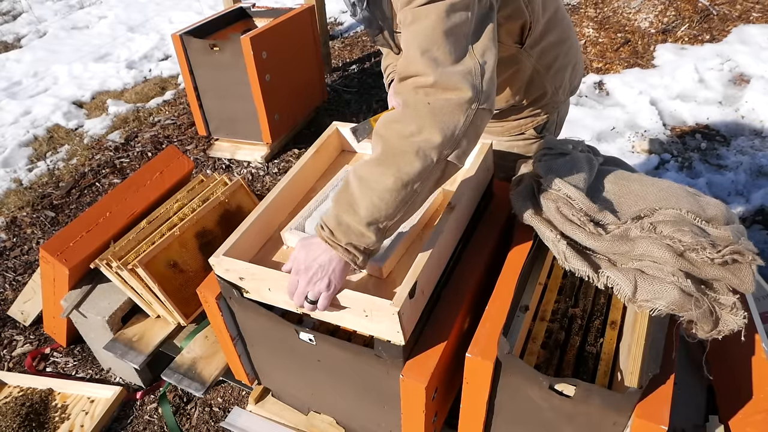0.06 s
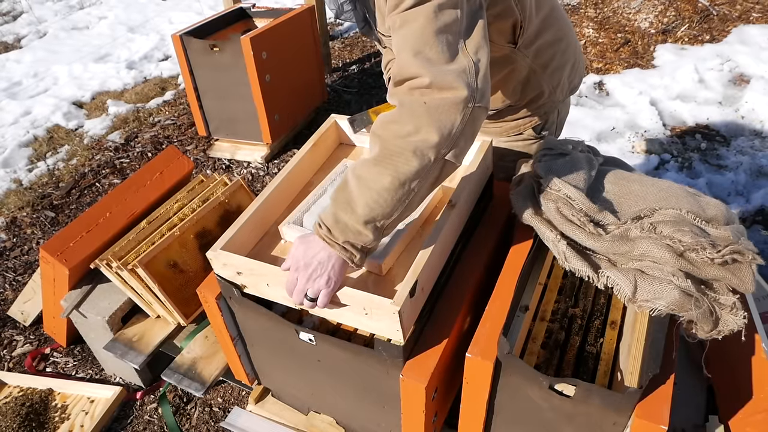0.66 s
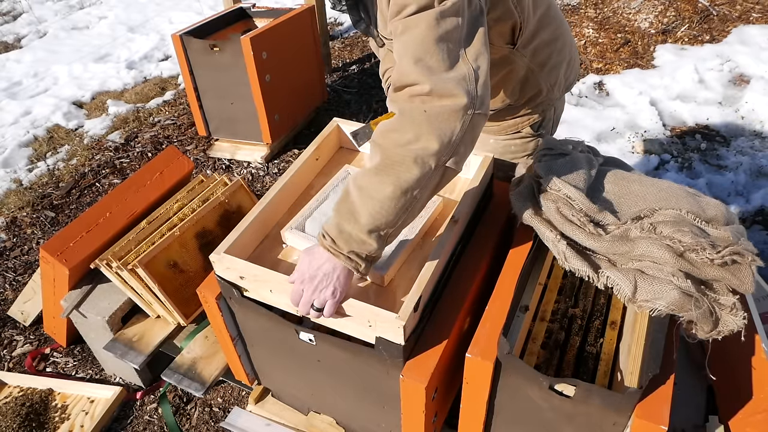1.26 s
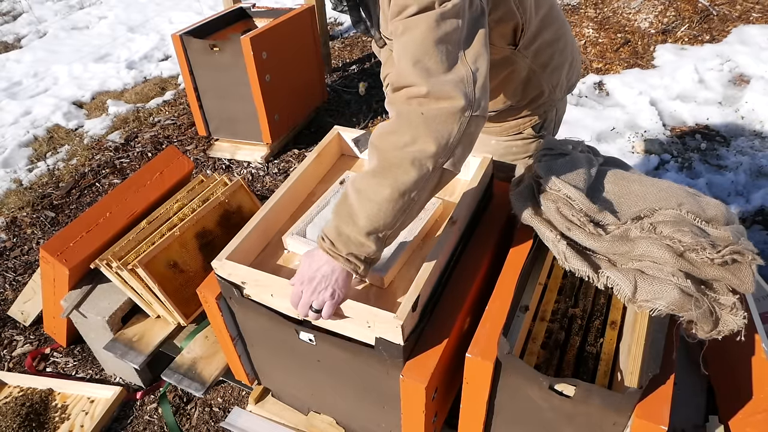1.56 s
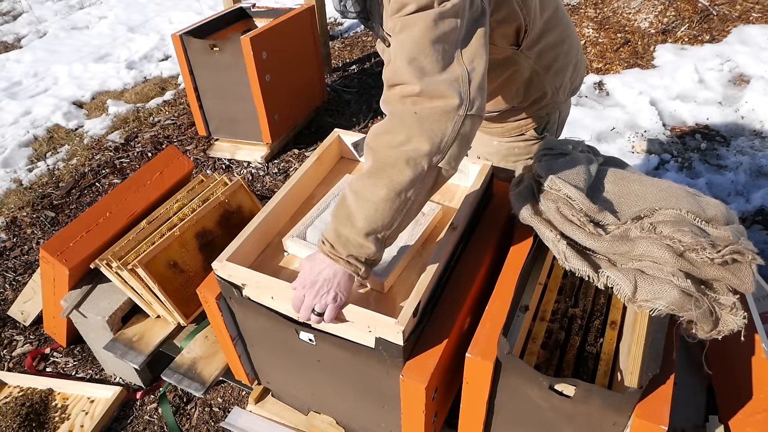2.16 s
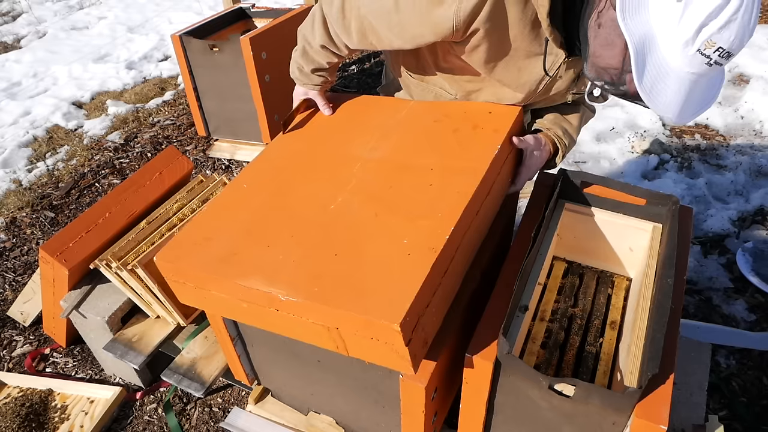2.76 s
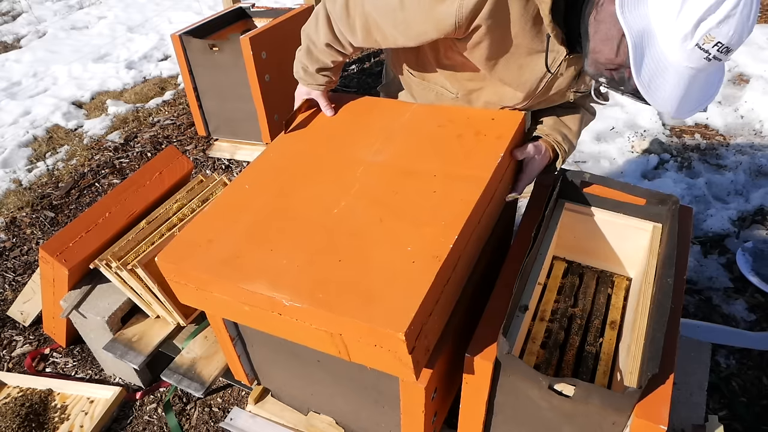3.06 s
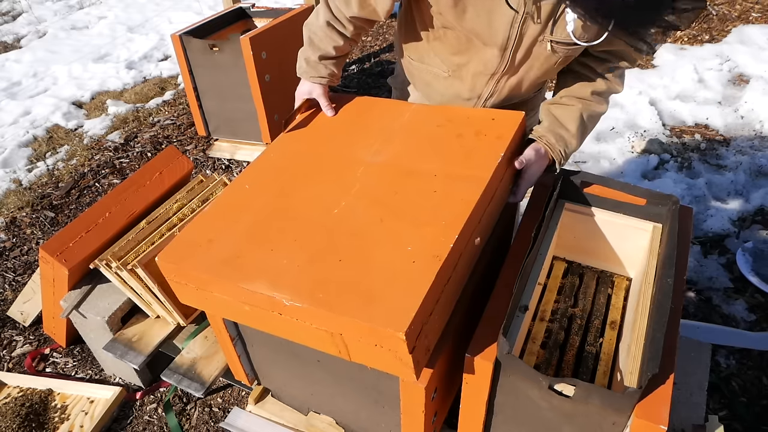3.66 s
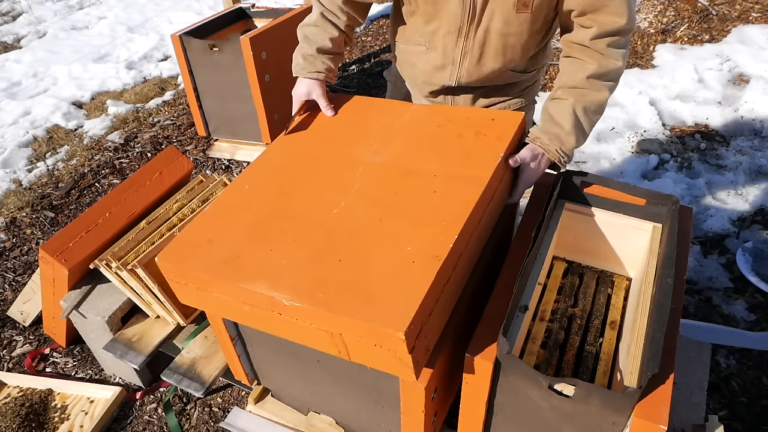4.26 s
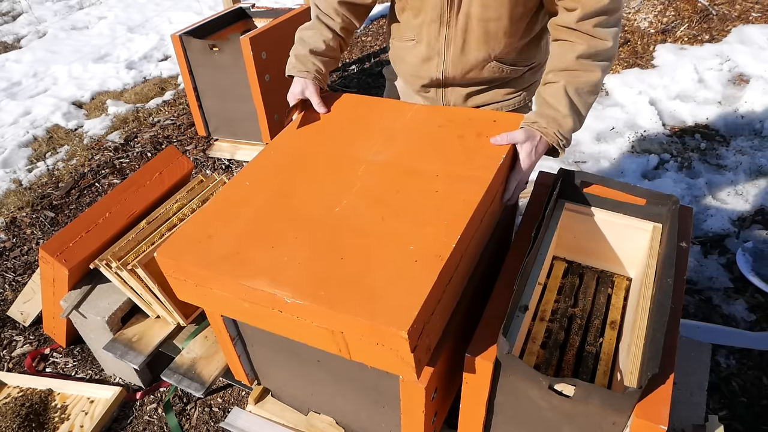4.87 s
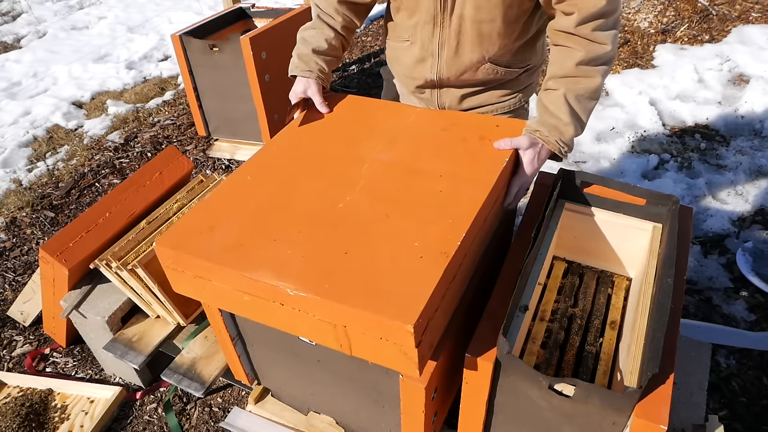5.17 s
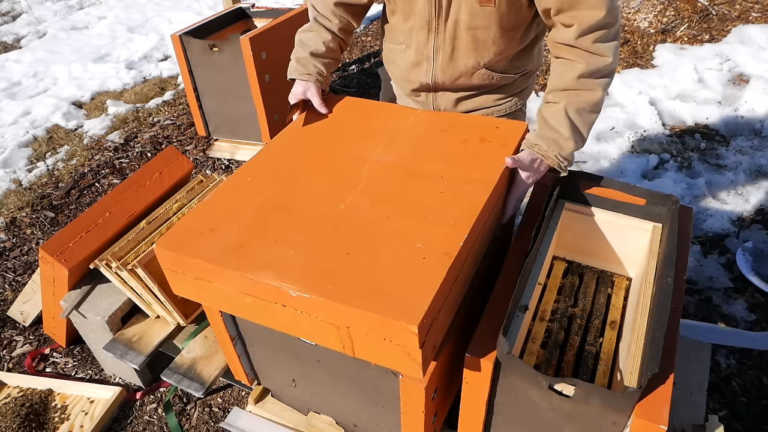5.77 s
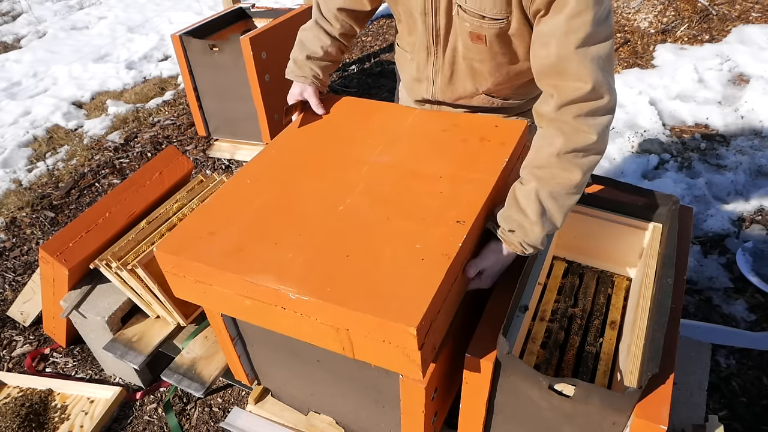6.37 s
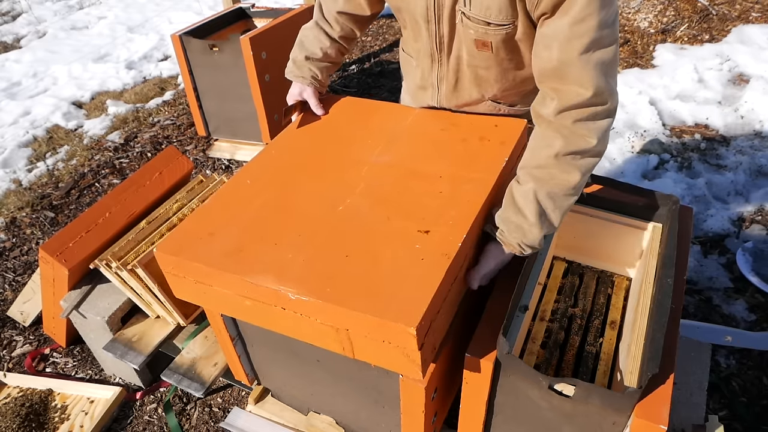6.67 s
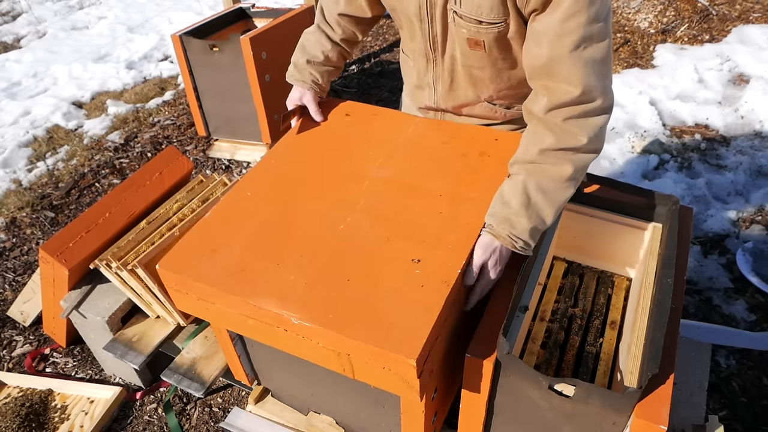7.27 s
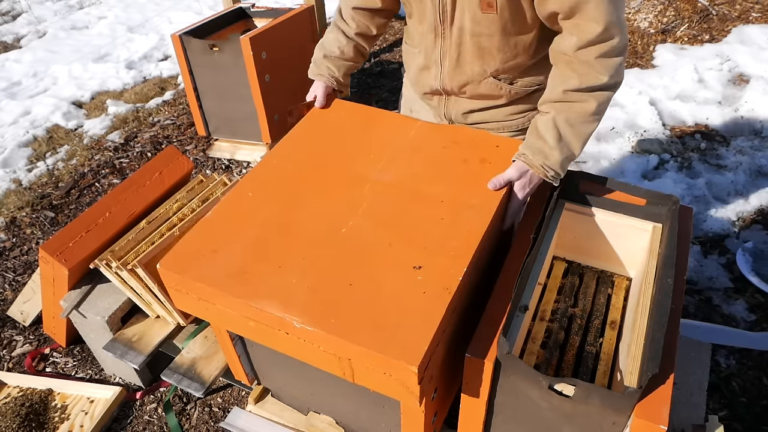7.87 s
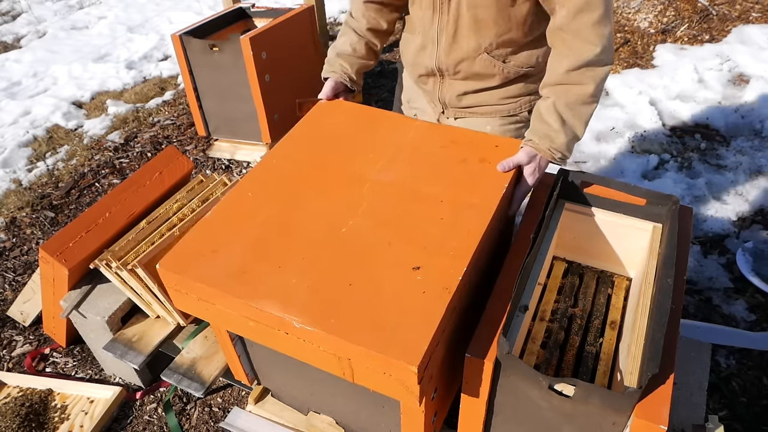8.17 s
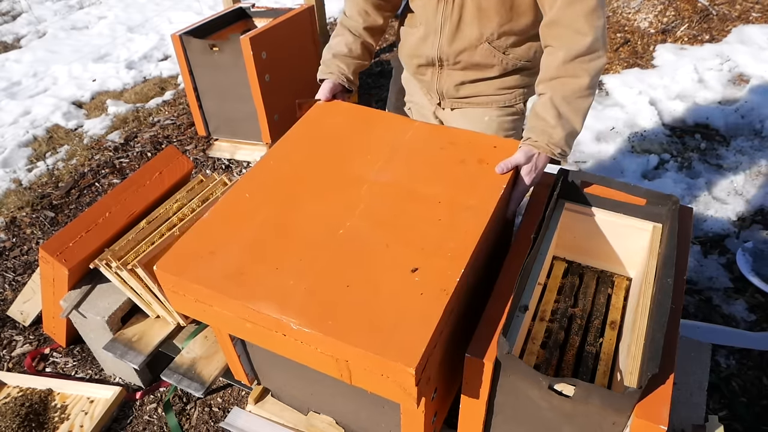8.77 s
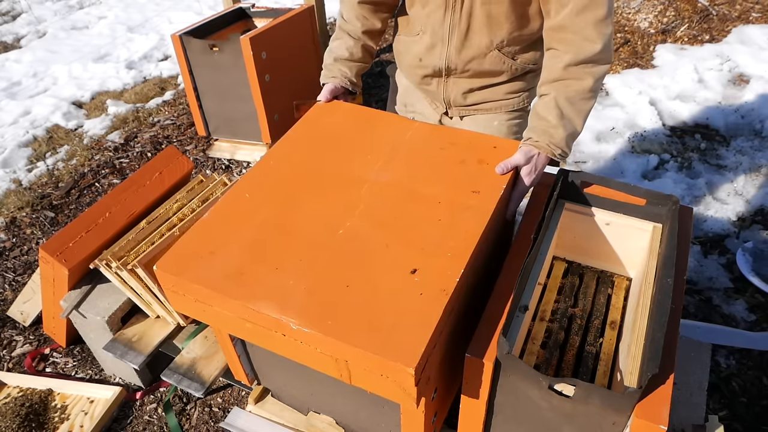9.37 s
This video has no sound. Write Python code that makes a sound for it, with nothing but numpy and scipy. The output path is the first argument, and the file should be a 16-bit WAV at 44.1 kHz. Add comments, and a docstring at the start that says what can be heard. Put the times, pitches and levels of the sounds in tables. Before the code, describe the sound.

Outdoors in gusty wind, a wooden hive lid drags, squeaks faintly and settles with hollow knocks amid rustling canvas.

```python
"""Closing a beehive

A beekeeper in a canvas jacket shifts a wooden tray on a hive, then works the lid down over it, outdoors.
Sleeves and hands rub, wood drags on wood with brief stick-slip squeaks, and grit and wax tick.
The lid taps and knocks as it seats, ringing its modes and thudding on the hollow hive body.
Wind buffets the microphone over a soft distant roar."""
import sys
import numpy as np
from scipy import signal
from scipy.fft import rfft, irfft
from scipy.io import wavfile
from scipy.ndimage import uniform_filter1d

SR = 44100
rng = np.random.default_rng(int(sys.argv[2]) if len(sys.argv) > 2 else 0)


def pcm_store(signal):
    """Save signal as 16-bit PCM."""
    levels = np.round(np.clip(np.atleast_2d(signal), -1, 1) * 32767)
    wavfile.write(sys.argv[1], SR, levels.astype(np.int16).T)


N = 415863

# bright hiss of firmly rubbed canvas, also the colour of the ticks: f/Hz, level/dB
CANVAS_SPECTRUM = [(500, -32), (1500, -7.5), (2400, 2.5), (3100, 2.5), (3900, 2.5), (4500, -1), (6200, -5),
                   (7300, 0), (8600, -0.5), (9700, -7.5), (11500, -7), (13000, -7), (16000, -17)]


def gain_of(db):
    """Decibels to amplitude."""
    return 10 ** (np.asarray(db) / 20)


def unit_rms(x):
    """Scales to rms 1."""
    return x / np.sqrt(np.mean(x ** 2) + 1e-20)


def colour(x, spectrum):
    """Shapes x with an EQ curve (f/Hz, level/dB) drawn on a log-frequency axis; rms 1."""
    hz, db = np.transpose(spectrum)
    f = np.fft.rfftfreq(len(x), 1 / SR)
    curve_db = np.interp(np.log(f + 1), np.log(hz + 1), db)
    return unit_rms(irfft(rfft(x) * gain_of(curve_db), len(x)))


def ring(x, hz, width_hz):
    """Passes x through one steep-sided resonance; rms 1."""
    f = np.fft.rfftfreq(len(x), 1 / SR)
    return unit_rms(irfft(rfft(x) / (1 + 2j * (f - hz) / width_hz) ** 2, len(x)))


def wobble(hz, width_hz):
    """Random modulation in a band of rates around hz; rms 1."""
    return ring(rng.standard_normal(N), hz, width_hz)


def add(mix, s, sound):
    """Mixes a sound in at time s."""
    part = mix[max(round(s * SR), 0):][:len(sound)]
    part += sound[:len(part)]


def wind(eddy_db=2, steadiness=0.75, burst_db=3.5, gust_eddy_db=-22):
    """Large eddies push on the microphone; small ones break off in bursts. Gusts swell both."""
    # the breeze: t/s, buffet level/dB, eddy level/dB
    breeze = [(0, -26, -42.5), (.97, -21.5, -40.5), (1.1, -27, -42), (1.8, -30, -45), (2.75, -33, -47),
              (2.79, -13.5, -33), (3.0, -13, -33), (3.4, -12.5, -38), (3.6, -19.5, -43), (3.87, -15, -35.5),
              (4.55, -17, -31), (4.95, -22, -43), (5.55, -17, -31), (6.8, -24.5, -41), (7.2, -20, -36.5),
              (7.6, -22.5, -42.5), (7.77, -16, -36), (9.12, -19, -31), (9.43, -17, -39.5)]
    # gusts that stand out of it: middle t/s, length/s, level/dB
    single_gusts = [(1.447, 0.29, -26), (2.023, 0.37, -21.5), (3.148, 0.039, -7), (3.324, 0.042, -11),
                    (3.855, 0.095, -11), (4.969, 0.05, -13), (5.14, 0.059, -15), (5.306, 0.059, -11.5),
                    (5.42, 0.039, -8), (6.006, 0.19, -12.5), (7.076, 0.3, -12.5), (7.815, 0.18, -10),
                    (8.063, 0.13, -11), (8.627, 0.1, -11.5), (9.135, 0.084, -10)]
    # deep rumble of the large eddies: f/Hz, level/dB
    buffet_spectrum = [(5, -13), (9, 4), (27, -3), (55, -6.5), (85, -13), (120, -23), (200, -37),
                       (400, -44.5), (1000, -100)]
    # low flutter of the small eddies: f/Hz, level/dB
    eddy_spectrum = [(50, -47), (100, 2.5), (150, 2), (220, -4.5), (320, -12.5), (450, -21), (700, -31),
                     (2000, -57)]
    times, *levels_db = np.transpose(breeze)
    buffet_level, eddy_level = (gain_of(np.interp(np.arange(N) / SR, times, db)) for db in levels_db)
    gusts = np.zeros(N)
    for middle, length, db in single_gusts:
        add(gusts, middle - length / 2, gain_of(db) * signal.windows.hann(int(length * SR)))
    buffet = colour(rng.standard_normal(N), buffet_spectrum)
    power = uniform_filter1d(uniform_filter1d(buffet ** 2, size=2400), size=1200)
    buffet = unit_rms(buffet / power ** (steadiness / 2))  # compressed, so each gust keeps its strength
    bursts = gain_of(burst_db * wobble(2.6, 74))
    eddies = colour(rng.standard_normal(N) * bursts, eddy_spectrum)
    buffet *= np.hypot(buffet_level, gusts)
    eddies *= np.hypot(eddy_level, gain_of(gust_eddy_db) * gusts)
    return buffet + gain_of(eddy_db) * eddies


def distant_roar(db=-42.5):
    """The even roar of the open country."""
    # dark outdoor air: f/Hz, level/dB
    air_spectrum = [(100, 12.5), (300, -6), (400, -0.5), (500, 4.5), (630, -0.5), (1000, -0.5),
                    (1500, -7.5), (2200, -15), (3200, -22), (6300, -27.5), (8500, -24.5), (10000, -31),
                    (13500, -35), (16000, -39)]
    return gain_of(db) * colour(rng.standard_normal(N), air_spectrum)


def friction(grains_per_s, grain_share, flutter_db):
    """Countless tiny slips merge into hiss; a few stand out as grains, and the pressure flutters."""
    grains = (rng.random(N) < grains_per_s / SR) * rng.standard_normal(N)
    pressure = gain_of(flutter_db * wobble(24, 160))
    hiss = rng.standard_normal(N)
    return pressure * (np.sqrt(1 - grain_share) * hiss + np.sqrt(grain_share) * unit_rms(grains))


def squeaks():
    """A sliding edge catches and chatters around one pitch."""
    # stick-slip squeaks and rasps: middle t/s, length/s, f/Hz, width/Hz, level/dB
    catches = [(0.2, 0.24, 3930, 5000, -61), (0.995, 0.026, 7450, 900, -53), (1.243, 0.074, 2380, 400, -55),
               (1.85, 0.14, 2500, 1800, -53), (2.49, 0.048, 3220, 450, -39),
               (2.819, 0.041, 1700, 3000, -38), (2.863, .03, 3100, 900, -40), (4.012, 0.13, 3470, 900, -54),
               (4.26, 0.24, 3700, 900, -53.5), (4.331, 0.03, 3500, 1000, -36),
               (4.468, 0.11, 3140, 900, -39), (4.8, 0.19, 2170, 2200, -65), (5.957, 0.081, 3450, 400, -41),
               (6.035, 0.023, 7300, 900, -35), (6.114, 0.19, 2670, 330, -35), (6.121, 0.3, 3740, 600, -41),
               (7.204, 0.22, 8550, 600, -39), (7.338, 0.15, 8600, 700, -39)]
    slips = friction(grains_per_s=310, grain_share=0.097, flutter_db=-1)
    chatter = slips * gain_of(3 * wobble(70, 120))
    out = np.zeros(N)
    for s, length, hz, width_hz, db in catches:
        swell = signal.windows.hann(int(length * SR))
        squeak = ring(chatter[int(s * SR):][:len(swell)], hz, width_hz)
        add(out, s - length / 2, gain_of(db) * swell * squeak)
    return out


def grit_ticks(t60=0.017, width_hz=9000):
    """Grit and wax snap between the parts."""
    # tiny dry snaps: t/s, level/dB, centre f/Hz
    snaps = [(0.138, -41.5, 7460), (0.478, -52, 10500), (1.56, -42, 6500), (1.802, -29.5, 2180),
             (1.829, -37, 3500), (1.949, -36.5, 8000), (2.057, -48, 4000), (2.319, -41.5, 3500),
             (2.777, -28.5, 3500), (2.858, -42, 4000), (2.993, -34, 8000), (3.261, -37, 4000),
             (3.493, -46, 3200), (4.323, -34, 3500), (6.762, -33, 3500), (7.231, -46, 3030),
             (7.479, -49, 4500), (8.772, -38.5, 6040), (8.843, -47, 5000)]
    out, t = np.zeros(N), np.arange(2048) / SR
    for s, db, hz in snaps:
        snap = ring(colour(rng.standard_normal(len(t)), CANVAS_SPECTRUM), hz, width_hz)
        add(out, s, gain_of(db - 60 * t / t60) * snap)
    return out


def stroke_envelope(surface, speed_power=1.72, settle_s=.16, settle_db=-11):
    """Friction level of "canvas" or "wood": each push gathers speed, holds it and comes to rest."""
    # arm pushes, sliding sleeve and wood together: t/s, rise/s, hold/s, fall/s, canvas/dB, wood/dB
    pushes = [(1.048, 0.23, .02, .08, -59, -51.5), (1.344, .06, 0.034, 0.088, -60, -52),
              (1.66, 0.15, .03, 0.16, -59, -45.5), (1.772, 0.03, .003, 0.055, -53, -40),
              (2.366, .11, 0.014, 0.038, -42, -38.5), (2.647, 0.055, 0.034, .03, -63, -56),
              (2.777, 0.0072, 0.019, 0.051, -44.5, -39.5), (2.851, 0.0076, 0.0081, .02, -43.5, -40),
              (2.99, 0.066, 0.064, 0.053, -50, -51), (3.194, 0.015, 0.032, 0.14, -46.5, -50),
              (3.56, .04, .06, .05, -56.5, -71), (3.723, .06, 0.06, .04, -52.5, -56),
              (3.916, 0.042, .005, 0.037, -46.5, -48), (3.973, 0.057, .01, 0.044, -47.5, -60),
              (4.188, .12, .01, .02, -58, -50), (4.313, .01, 0.0055, 0.057, -38.5, -36),
              (4.365, .03, .01, 0.033, -53, -47), (4.42, 0.037, 0.018, 0.061, -42, -43),
              (4.502, 0.038, 0.12, 0.071, -46, -44.5), (4.663, 0.13, 0.018, 0.059, -60, -42),
              (5.086, .02, 0.037, 0.047, -53.5, -44), (5.328, 0.037, 0.032, .04, -48.5, -44.5),
              (5.403, 0.037, .02, 0.12, -43.5, -41.5), (5.486, .06, 0.042, 0.16, -48, -44.5),
              (5.717, .06, .07, .06, -47.5, -44.5), (5.82, 0.054, .02, 0.052, -43, -57),
              (5.902, 0.097, .08, .14, -39, -43.5), (6.118, 0.041, .05, 0.11, -43, -43.5),
              (6.28, 0.089, 0.044, 0.074, -55, -51), (6.476, 0.052, 0.021, 0.027, -53, -52),
              (6.555, 0.029, 0.022, 0.16, -48.5, -44), (6.724, 0.034, 0.022, 0.043, -50.5, -49),
              (6.926, 0.017, .005, 0.035, -49, -36), (6.955, 0.039, 0.012, 0.1, -40, -36),
              (7.098, 0.071, 0.021, 0.14, -36.5, -36.5), (7.179, 0.035, .005, 0.058, -36, -27.5),
              (7.285, .055, 0.05, 0.062, -36, -34), (7.477, 0.0068, 0.0064, 0.012, -49, -65),
              (7.506, 0.072, 0.027, 0.097, -37.5, -45), (7.656, 0.12, 0.16, 0.044, -41, -44.5),
              (7.908, 0.066, 0.046, 0.097, -38, -40.5), (8.096, 0.047, 0.061, 0.072, -48, -45.5),
              (8.297, 0.073, 0.055, 0.065, -48.5, -42.5), (8.52, 0.072, 0.13, 0.14, -61, -68),
              (8.91, .05, .05, .08, -62.5, -64)]
    power = np.zeros(N)
    for start, rise, hold, fall, canvas_db, wood_db in pushes:
        db = canvas_db if surface == "canvas" else wood_db
        length = rise + hold + fall
        t = np.arange(0, length, 1 / SR)
        ramp = np.clip(np.minimum(t / rise, (length - t) / fall), 0, 1)
        speed = np.sin(np.pi / 2 * ramp)
        add(power, start, (gain_of(db) * speed ** speed_power) ** 2)
    level = np.sqrt(power)
    stir = uniform_filter1d(level, size=int(settle_s * SR))  # the parts stir faintly around each push
    return np.hypot(level, gain_of(settle_db) * stir)


def canvas_rub(db=3, firm_db=-44):
    """Canvas hisses over the boards, its tone shifting with force; the lid reflects it as the arm moves."""
    # hiss of lightly brushed canvas: f/Hz, level/dB
    light_spectrum = [(500, -49), (1500, 7), (2400, 0), (3100, 8.5), (3600, 6.5), (4100, 6.5), (4500, 1),
                      (6200, -1.5), (7400, 1.5), (8600, 1), (9700, -7.5), (11500, -14), (13000, -6),
                      (16000, -22)]
    level = stroke_envelope("canvas")
    slips = friction(grains_per_s=860, grain_share=0.13, flutter_db=1.26)
    n = np.arange(N)
    delay_s = .0009 * np.exp(.3 * wobble(1, 2))
    slips = slips + .4 * np.interp(n - SR * delay_s, n, slips)  # the moving reflection gently flanges
    firmness = level / (level + gain_of(firm_db))
    hiss = firmness * colour(slips, CANVAS_SPECTRUM) + (1 - firmness) * colour(slips, light_spectrum)
    return gain_of(db) * level * hiss


def wood_drag(db=3):
    """Slips of wood on wood sound through the boards."""
    # body of the boards: f/Hz, level/dB
    board_spectrum = [(120, 4), (240, 7.5), (340, 12), (430, 4), (560, 8), (780, 4), (1080, 5.5), (1400, 0),
                      (2000, 0), (2800, -3), (3800, -14.5), (5000, -13.5), (9000, -32.5), (16000, -51)]
    slips = friction(grains_per_s=320, grain_share=0.39, flutter_db=-2.0)
    return gain_of(db) * stroke_envelope("wood") * colour(slips, board_spectrum)


def lid_ring(band_hz, rattle_t60=0.031, yard_db=-24, yard_t60=0.11):
    """The struck lid in one band: its modes, the dense rattle of its joints, a faint return from the yard."""
    # modes of the lid: f/Hz, level/dB, t60/s
    lid_modes = [(175, -8, 0.1), (254, -4, 0.086), (295, 1.5, 0.041), (358, -4, 0.095), (450, -1.5, 0.045),
                 (498.5, 2, 0.068), (593, 3, 0.04), (686, -24, 0.022), (1002, -6.5, 0.059),
                 (1086, 3.5, 0.042), (1266, 3.5, 0.023), (1430, -9.5, 0.069), (1930, -11, 0.019),
                 (2090, 11, 0.012), (2630, -42, 0.0078), (2700, -5, .02), (3000, 15, 0.0056),
                 (4190, -1, 0.021), (5030, -8, 0.033), (5900, -12, 0.014), (6560, -27, .014),
                 (7360, -13, 0.014), (8800, -14, 0.011)]
    t = np.arange(8192) / SR
    modes = np.zeros(len(t))
    for k, (hz, db, t60) in enumerate(lid_modes):
        if band_hz[0] <= hz < band_hz[1]:
            polarity = (-1) ** (k // 4)
            modes += polarity * gain_of(db - 60 * t / t60) * np.sin(2 * np.pi * hz * t)
    rattle_spectrum = [(100, 4), (400, 6.5), (800, 13), (3000, 10.5), (4600, -6), (8500, -12), (16000, -30)]
    rattle = colour(rng.standard_normal(len(t)), rattle_spectrum)
    rattle = signal.sosfilt(signal.butter(3, band_hz, "bandpass", fs=SR, output="sos"), rattle)
    decay = gain_of(-60 * t / rattle_t60) + gain_of(yard_db - 60 * t / yard_t60)
    return modes + 2 * rattle * decay


def wood_taps(trim_db=3):
    """Soft contacts ring mainly the lower modes of the wood."""
    # light taps and settling: t/s, level/dB, low-pass f/Hz
    contacts = [(1.8, -35, 2500), (2.742, -28, 500), (3.852, -35, 1500), (6.76, -32, 1500),
                (6.943, -30, 1517), (7.031, -38, 1500), (7.244, -24, 1300), (7.441, -25, 900),
                (7.456, -22, 1090), (7.737, -18.5, 1400)]
    out = np.zeros(N)
    for s, db, cutoff_hz in contacts:
        tap = signal.lfilter(*signal.butter(2, cutoff_hz, fs=SR), lid_ring([200, 15000]))
        add(out, s, gain_of(db + trim_db) * tap / abs(tap).max())
    return out


def lid_knocks(band_trims_db=(-2, 0, 1, 1, 1, 1), graze_s=.0033, graze_db=-24):
    """An edge grazes, then lands; where and how hard decides which bands of modes ring."""
    # blows on the lid: t/s, level/dB, then relative level/dB in six ranges of the lid's modes, low to high
    blows = [(2.773, -15, -12.5, -22, -22, -31, -44, -38),
             (5.072, -7, -17.5, -23.5, -16, -15.5, -14.5, -26.5),
             (6.806, -11.5, -9.5, -17.5, -13.5, -15.5, -10, -19),
             (7.229, 0, -23.5, -44, -37, -27.5, -32, -36), (7.419, -1.5, -6.5, -13.5, -22, -18.5, -28, -50)]
    edges_hz = [130, 390, 530, 1150, 1970, 5200, 15000]
    out = np.zeros(N)
    for s, db, *bands_db in blows:
        for k, (band_db, trim_db) in enumerate(zip(bands_db, band_trims_db)):
            band = lid_ring(edges_hz[k:k + 2])
            attack_rms = np.std(band[:SR // 100])
            band *= gain_of(db + band_db + trim_db) / attack_rms
            add(out, s, gain_of(graze_db) * band)
            add(out, s + graze_s, band)
    return out


def hive_thuds(t60=0.057, rise_s=0.0023, noise_db=-6):
    """A padded push makes the hollow hive body thud, at a pitch set by where it lands."""
    # the lid's weight bumping on the hive: t/s, level/dB, f/Hz
    bumps = [(3.85, -12.5, 244), (3.88, -29, 260), (3.949, -20.5, 246), (4.415, -13.5, 267),
             (4.487, -16.5, 297), (4.505, -14.5, 262), (6.809, -8, 286), (7.23, -6.5, 208),
             (7.424, -1, 168)]
    # dull noise under the thud's tone: f/Hz, level/dB
    thud_spectrum = [(40, -60), (90, 23), (160, 18), (250, 8), (320, -3), (450, -3), (700, 4), (2000, -38),
                     (8000, -72)]
    out, t = np.zeros(N), np.arange(8192) / SR
    attack = 1 - np.exp(-t / rise_s)
    for s, db, hz in bumps:
        noise = colour(rng.standard_normal(len(t)), thud_spectrum)
        thud = np.sin(2 * np.pi * hz * t) + gain_of(noise_db) * noise
        add(out, s, gain_of(db - 60 * t / t60) * attack * thud)
    return out


def scene():
    """Close handling of the hive over an outdoor bed, in mono."""
    outdoors = wind() + distant_roar()
    sliding = canvas_rub() + wood_drag() + squeaks()
    impacts = lid_knocks() + hive_thuds() + wood_taps() + grit_ticks()
    return (outdoors + sliding + impacts)[None]


def record(dry, cutoff_hz=15800):
    """Peaks round off at full scale, then a steep low-pass trims the top."""
    rounded = dry / (1 + dry ** 8) ** (1 / 8)
    lowpass = signal.firwin(511, cutoff_hz, window=("kaiser", 9), fs=SR)
    return signal.oaconvolve(rounded, lowpass[None], "same")


dry = scene()
out = record(dry)
pcm_store(out)
```